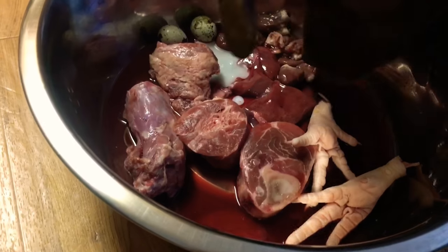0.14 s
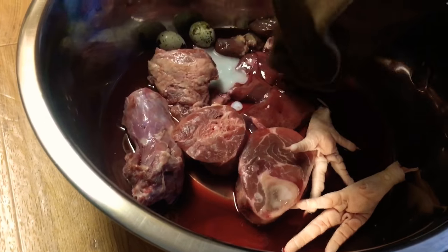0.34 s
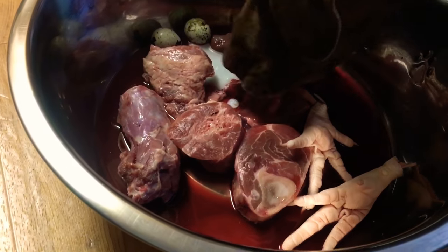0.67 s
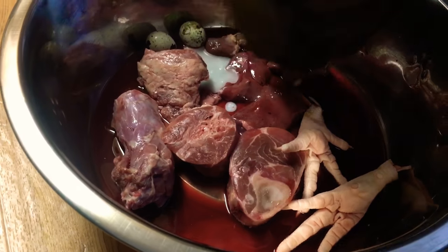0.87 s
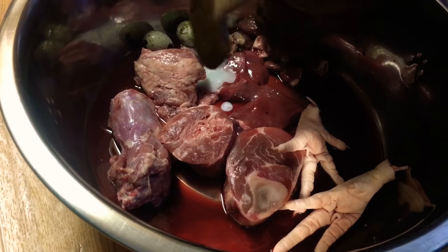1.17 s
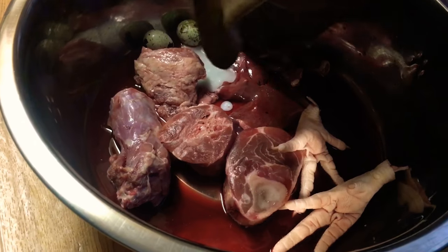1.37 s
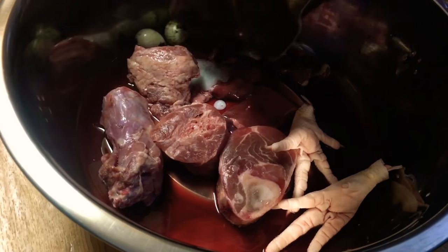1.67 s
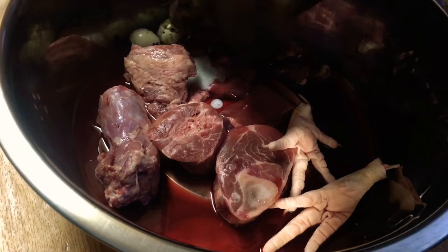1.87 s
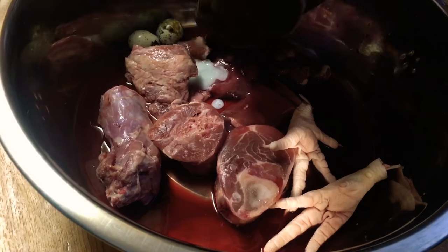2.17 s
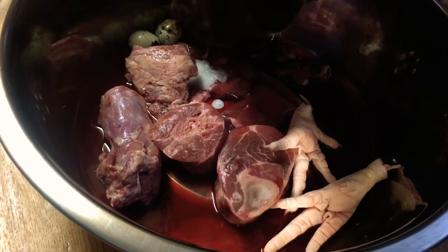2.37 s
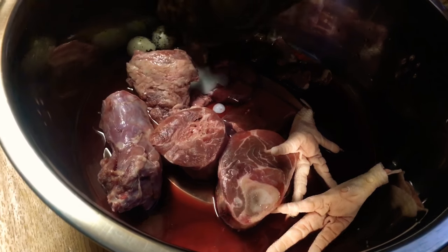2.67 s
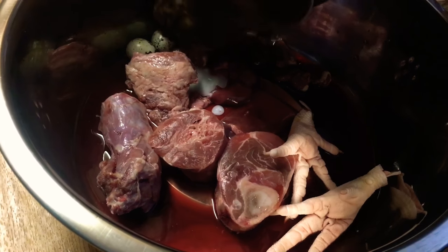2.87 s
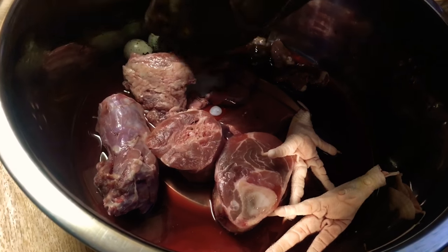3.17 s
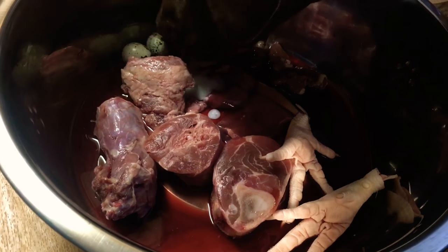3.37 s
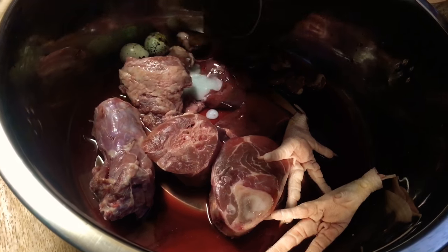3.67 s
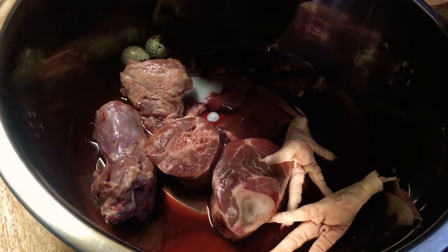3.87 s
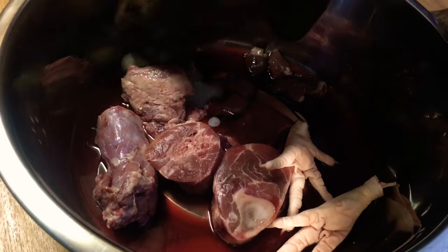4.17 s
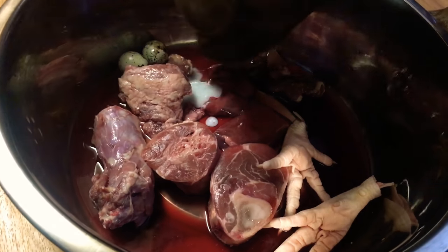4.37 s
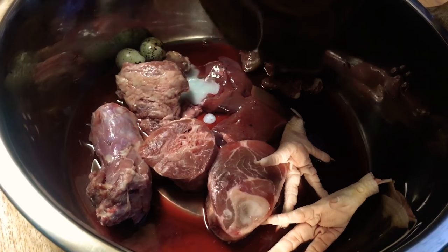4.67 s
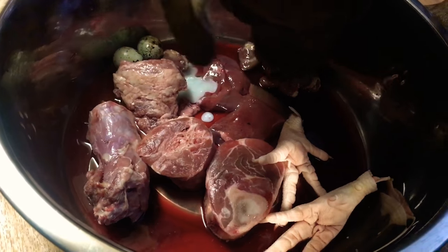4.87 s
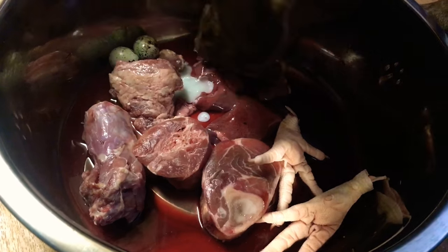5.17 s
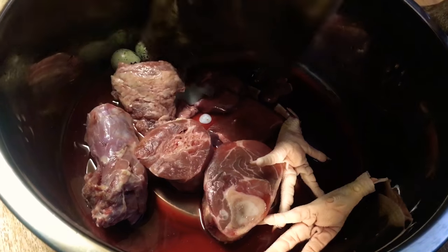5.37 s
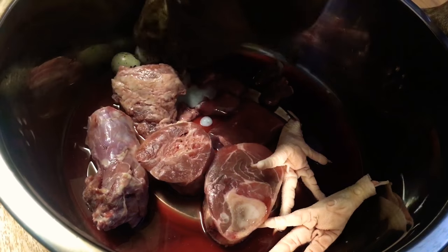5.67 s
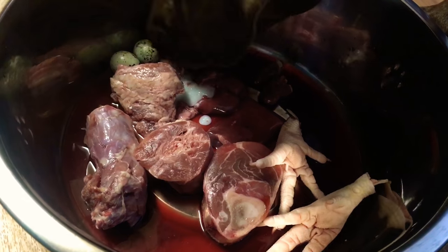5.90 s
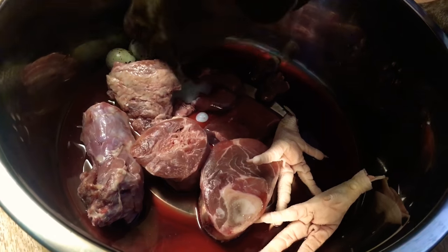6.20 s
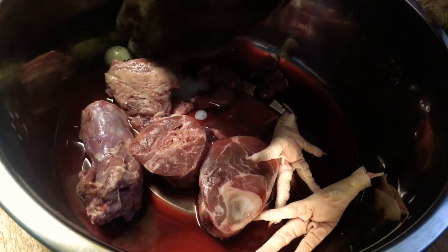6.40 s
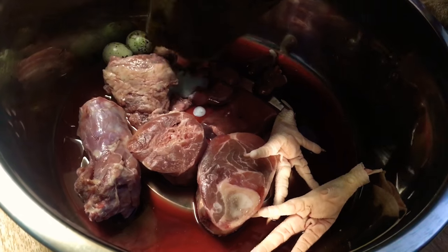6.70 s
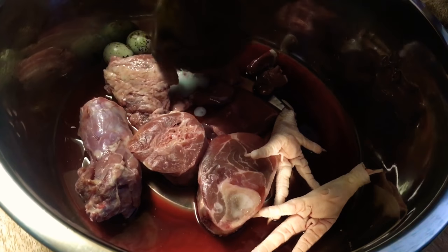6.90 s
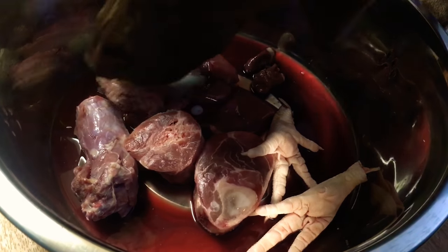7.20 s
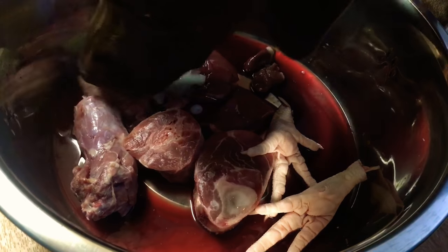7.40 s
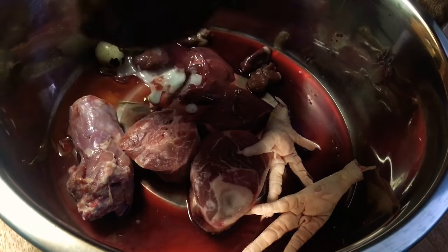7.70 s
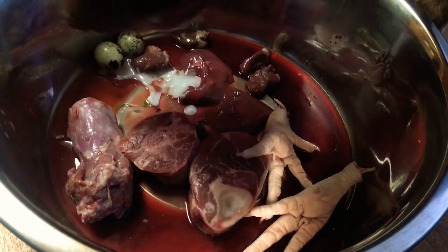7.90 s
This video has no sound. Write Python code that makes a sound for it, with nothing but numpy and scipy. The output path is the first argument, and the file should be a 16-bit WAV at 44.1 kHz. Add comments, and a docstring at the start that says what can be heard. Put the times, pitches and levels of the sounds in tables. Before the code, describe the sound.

Very close to a steel bowl in a quiet room, a dog licks and chews raw meat. After opening thuds and soft licks, wet smacks come several a second, some popping sharply, amid squelching, fine saliva crackle and a low rumble of shifting meat. Heavy dull knocks land near five and six seconds; then the eating eases into softer licks.

```python
"""A dog eats raw meat out of a steel bowl, heard from just above the rim in a quiet room.
Wet smacks are short decaying sines with a noise snap; saliva ticks are noise bursts ringing high up.
Squelch, fizz and the rumble of the shifting load are showers of tiny ringing grains under level curves.
Muzzle thuds are sines that sink in pitch; a faint metal ting, sucks of ringing noise and room noise join.
"""
import sys
import numpy as np
from scipy import signal
from scipy.fft import rfft, irfft, next_fast_len
from scipy.io import wavfile
from scipy.ndimage import uniform_filter1d

SR = 44100
rng = np.random.default_rng(int(sys.argv[2]) if len(sys.argv) > 2 else 0)


def bounce(signal):
    """Save signal as a 16-bit WAV file at the path given by the first command-line argument."""
    frames = np.transpose(np.atleast_2d(signal))
    limited = np.clip(frames, -1, 1)
    pcm = np.round(limited * 32767).astype(np.int16)
    wavfile.write(sys.argv[1], SR, pcm)


N = 355005

# Steady room noise, relative spectrum: f/Hz, density/dB
ROOM_COLOUR = [(25, -37), (45, -38), (72, -5.5), (200, -7.5), (420, -17), (680, -13.5), (850, -20),
               (1300, -18.5), (2550, -17), (3650, -24), (4350, -32.5), (5100, -40), (9500, -37.5),
               (16000, -56.5)]
# Resonances in the room noise: f/Hz, width of each pass/Hz, rms level before the waver/dB
ROOM_RESONANCES = [(1031, 150, -58.5), (2624, 300, -64), (9490, 390, -76.5)]
# Meat shifting under the muzzle, before the trim in jostling(): t/s, rumble level/dB
JOSTLE_CURVE = [(0, -40.5), (1.41, -41), (2.82, -41), (3.2, -43.5), (4, -42.5), (4.9, -45), (5.9, -45.5),
                (6.5, -40.5), (7.4, -44), (7.85, -41), (8.05, -36.5)]
# Colour of that rumble: f/Hz, relative level/dB
LOAD_COLOUR = [(65, -17.5), (85, -3), (115, 4.5), (150, -3.5), (185, -4), (260, -7), (400, -13.5),
               (550, -22.5)]
# Soft chewing between the strokes, before the trim in licking(): t/s, level/dB
CHEWING_CURVE = [(0, -63), (1.2, -50), (2.9, -50.5), (3.25, -45), (4.7, -44), (4.98, -50.5), (5.25, -43.5),
                 (6.6, -45.5), (7.1, -47), (7.62, -44.5), (7.8, -54)]
# Tongue strokes, before the trims in licking(): t at the height/s, squelch level/dB, saliva fizz level/dB
LICKS = [(.07, -49, -59), (.26, -57, -59.5), (.75, -49, -70), (1.04, -47, -57), (1.19, -51, -57.5),
         (1.42, -42.5, -59), (1.58, -49, -56.5), (1.835, -49, -66), (1.98, -43, -61), (2.23, -42, -63),
         (2.47, -42.5, -59), (2.665, -43.5, -62), (2.93, -45, -53), (3.04, -54, -55), (3.16, -43, -68),
         (3.35, -41, -58), (3.56, -41, -63), (3.75, -41, -67), (3.96, -44.5, -63), (4.08, -50, -57),
         (4.31, -41.5, -64), (4.49, -39.5, -64), (4.65, -43, -62), (5.09, -48, -65), (5.21, -52, -56.5),
         (5.469, -44, -56), (5.68, -49, -59.5), (5.88, -40, -56), (6.08, -38, -62), (6.24, -40.5, -55),
         (6.45, -45, -55), (6.56, -44, -64), (6.77, -40.5, -57), (6.922, -45.5, -60), (7.46, -49, -65),
         (7.56, -51, -59), (7.75, -50, -55.5), (7.93, -45, -53)]
# Colour of the squelch in the mouth: f/Hz, relative level/dB
MOUTH_COLOUR = [(800, -11), (1050, -9.5), (1350, -3), (1700, -4.5), (2200, 1), (2800, -5), (3500, -9.5),
                (4500, -50)]
# Colour of the saliva fizz: f/Hz, relative level/dB
FIZZ_COLOUR = [(4500, -41.5), (6200, 5), (7500, 12.5), (8600, 1), (9600, 8.5), (11500, 1), (15000, -0.5)]
# Dull knocks of muzzle and meat, before the bowl colours them: t/s, level/dB, final f/Hz
THUDS = [(0.0041, -7.5, 110), (0.076, -12.5, 112), (0.089, -14.5, 100), (1.497, -19, 99),
         (1.5551, -11, 113), (1.7019, -4.5, 125), (2.1556, -16, 102), (2.199, -19, 119), (3.1628, -21, 101),
         (3.2428, -23.5, 104), (3.6123, -25, 86.5), (3.928, -19.5, 122), (4.0128, -19, 114),
         (4.9443, 1.5, 110.5), (6.2922, 2.5, 108), (6.3273, -6, 119), (6.67, -20, 94)]
# How the loaded bowl colours a knock: f/Hz, width/Hz, gain/dB
BOWL_BODY = [(288, 350, -3.5), (470, 98, 2), (750, 620, -12), (1050, 220, 21)]
# Loudest saliva threads snapping: t/s, peak level/dB, f/Hz
TICKS = [(1.0559, -39, 7900), (1.1848, -39, 8200), (1.5804, -39, 6600), (1.683, -40.5, 6560),
         (1.9789, -37, 7850), (2.2503, -42, 8300), (2.6592, -40, 7300), (2.981, -35.5, 9700),
         (3.0061, -38, 7650), (3.063, -35.5, 7440), (4.314, -32, 6700), (4.517, -41, 6800),
         (5.7075, -44, 6600), (6.7738, -41, 7100), (6.9072, -37, 6470), (7.766, -42, 7500),
         (7.9237, -38, 8050)]
# Loud smacks of tongue and lips: t/s, pop peak level/dB, pocket f/Hz,
# decay/cycles (held to at least 0.5), film snap peak level/dB
SMACKS = [(0.0735, -29.5, 1470, 1.4, -49), (0.45, -36.5, 3360, 1.8, -49), (0.7433, -32, 1400, 1.3, -40.5),
          (1.0358, -23, 3100, .82, -38), (1.2311, -29, 2140, 5.8, -47), (1.4082, -29, 2700, 1.4, -50),
          (1.597, -32, 3520, 7.3, -36), (1.6721, -29.5, 980, 1.8, -53), (1.7401, -24, 1840, 1.2, -62),
          (1.817, -26, 2510, 6.4, -45), (1.9235, -29, 1870, 1.1, -60), (1.9473, -14.5, 1810, 0.43, -57),
          (1.9833, -16.5, 1610, 2.1, -50), (2.0211, -28, 2140, 2.8, -50), (2.2224, -24.5, 2000, 2, -55),
          (2.244, -28, 1500, .9, -54), (2.4332, -7, 2270, 1.8, -34), (2.4404, -21, 2120, 2.6, -33.5),
          (2.4732, -25, 2400, .78, -37.5), (2.5999, -18, 2650, 0.85, -33), (2.6439, -8, 2360, 2.2, -39),
          (2.8772, -17.5, 2500, 3.2, -25.5), (2.954, -24, 1500, 0.55, -49), (2.9623, -26, 2970, 1.6, -44),
          (3.1303, -1.5, 2020, 1.3, -32), (3.137, -16, 2170, 2.5, -35), (3.1517, -21, 2120, 1.1, -43),
          (3.166, -22, 2320, 1, -47), (3.214, -23.5, 1930, .43, -60), (3.3321, -33.5, 4600, 1.5, -48),
          (3.3464, -24.5, 2030, 3.6, -41), (3.3634, -23, 2700, 3.4, -53), (3.382, -27, 2210, 2, -53),
          (3.5698, -26.5, 1980, 0.8, -51), (3.7393, -24, 1630, 3, -41.5), (3.7935, -26, 2020, 1.8, -51),
          (4.0642, -25, 2130, 2, -42), (4.073, -18.5, 2300, 2.8, -30), (4.1292, -33, 3630, 4, -42),
          (4.3136, -18, 1910, 3.5, -44), (4.3156, -21, 2820, 6, -47), (4.401, -32, 2020, 7.6, -42),
          (4.4894, -30, 1500, 1.4, -56), (4.4944, -30.5, 2550, 3, -55), (4.5795, -25, 3360, 9.3, -42),
          (4.5863, -23, 3000, 1.2, -44), (4.6338, -18.5, 2300, 0.54, -52), (4.641, -25.5, 1580, 2.1, -34),
          (5.0354, -30.5, 2740, .85, -40), (5.0851, -29, 1430, 3.2, -48), (5.0923, -24.5, 2740, 1.3, -53),
          (5.2587, -30, 2120, 1, -47), (5.4433, -16.5, 1730, 1.3, -48), (5.4504, -5.5, 1590, 0.81, -28.5),
          (5.484, -24, 2820, 4, -32.5), (5.658, -20, 1710, 1.2, -58), (5.8352, -21.5, 1110, 4.8, -47),
          (5.8733, -25.5, 1900, 3.1, -49), (5.9033, -24, 2660, 4.3, -37), (5.9354, -21, 2260, .46, -48),
          (6.0084, -28.5, 3400, .69, -40), (6.067, -25.5, 2020, 3.6, -36), (6.0714, -27, 1680, 1.6, -56),
          (6.1, -25, 2370, 1, -39), (6.2738, -13, 1910, 2.9, -30.5), (6.283, -19.5, 2000, .58, -47),
          (6.4155, -19, 2600, 9.9, -36), (6.4264, -22, 2240, 1.3, -47), (6.5067, -21.5, 2180, 0.96, -38),
          (6.5559, -24.5, 2100, 2.5, -51), (6.6937, -31, 1950, 4, -39), (6.7654, -25.5, 2040, 5, -40),
          (7.185, -33, 1010, 2.4, -63), (7.462, -30, 1840, 3.6, -58), (7.532, -31, 1144, 5.6, -59),
          (7.7525, -34, 1310, 1.1, -37), (7.916, -33, 2500, 4.7, -39.5)]
# One thin metallic ting: t/s, level before the soft attack/dB, f/Hz, t60/s
TING = [(.105, -55.5, 7806, .3)]
# Drawn-out sucks of a ringing wet cavity: t/s, peak level/dB, f/Hz, length/s
SUCKS = [(3.891, -31, 355, 0.018), (4.002, -27.5, 346, .016), (4.004, -34.5, 532, 0.019),
         (4.076, -47, 6150, .045), (4.082, -42, 2120, .04), (7.911, -29, 2400, .03),
         (7.925, -32, 940, 0.011), (7.946, -38, 2320, 0.035)]

ROOM_DB, CUTOFF_HZ = -49, 15900
CHEW_FIZZ_DB = -65.5  # before the trim in licking()
LICK_RISE_S, LICK_RELEASE_S = 0.017, 0.04
FIZZ_RISE_S, FIZZ_RELEASE_S = 0.014, 0.046

# After a hard knock the load drops back once
REBOUND_ABOVE_DB, REBOUND_LOSS_DB, REBOUND_HZ = -7, 11.5, 104
REBOUND_S, REBOUND_S_PER_DB = 0.0148, 0.00063

# Lesser saliva threads round each stroke; level is above the stroke's tabled fizz
THREAD_OVER_DB, THREAD_SCATTER_DB, THREAD_SPREAD_S = 12.5, 2.5, 0.04
THREAD_HZ, THREAD_OCTAVES = 7900, 0.2

# Lesser pops round each stroke; level is above the stroke's tabled squelch, the snap relative to the pop
POP_OVER_DB, POP_SCATTER_DB, POP_SNAP_DB = 8, 2, -20.5
POP_LAG_S, POP_SPREAD_S = 0.01, 0.021
POP_HZ, POP_OCTAVES, POP_CYCLES = 2164, 0.35, 1.7


def from_db(db):
    """Decibels to gain."""
    return 10 ** (np.asarray(db) / 20)


def rms_one(x):
    """Scale to an rms of one."""
    return x / np.sqrt(np.mean(x ** 2) + 1e-20)


def level_curve(rows):
    """Read a (t/s, level/dB) curve at every sample."""
    s, db = np.transpose(rows)
    return np.interp(np.arange(N) / SR, s, db)


def at_hz(points, hz):
    """Read a spectrum on a log-frequency axis."""
    points = np.array(points)
    return np.interp(np.log(np.maximum(hz, 1)), np.log(points[:, 0]), points[:, 1])


def add(out, s, sound):
    """Mix a sound in at a time."""
    i = int(np.clip(round(s * SR), 0, N))
    out[i:i + len(sound)] += sound[:N - i]


def band(x, low_hz, high_hz, order=2):
    """Butterworth band-pass."""
    sos = signal.butter(order, [low_hz, high_hz], "band", fs=SR, output="sos")
    return signal.sosfilt(sos, x)


def resonate(x, hz, width_hz):
    """One resonance with a gain of about one on top."""
    r = np.exp(-np.pi * width_hz / SR)
    feed = np.array([1, 0, -1]) * (1 - r * r) / 2
    feedback = [1, -2 * r * np.cos(2 * np.pi * hz / SR), r * r]
    return signal.lfilter(feed, feedback, x + 1e-18)


def resonate_twice(x, hz, width_hz):
    """Two equal resonances in a row, for steeper skirts."""
    return resonate(resonate(x, hz, width_hz), hz, width_hz)


def drift(rate):
    """Slow random wander with an rms of one, through `rate` fresh values a second."""
    knots = rng.standard_normal(N // 50)
    return rms_one(np.interp(np.arange(N) / SR * rate, np.arange(len(knots)), knots))


def swell(t, rise, decay):
    """A rounded attack and an exponential tail, peak one."""
    shape = (1 - np.exp(-(t / rise) ** 2)) * np.exp(-t / decay)
    return shape / shape.max()


def grains(colour, per_s, spread_db, sharpness, evenness, count=22):
    """Small random impulses, each ringing briefly at one of `count` pitches; rms one."""
    sizes = from_db(spread_db * np.minimum(rng.exponential(1, N), 4)) * rng.choice([-1, 1], N)
    clicks = sizes * (rng.random(N) < per_s / SR)
    pitch_index = rng.integers(0, count, N)
    out = np.zeros(N)
    for k, hz in enumerate(np.geomspace(colour[0][0], colour[-1][0], count)):
        ring = resonate_twice(clicks * (pitch_index == k), hz, hz / sharpness)
        out += from_db(at_hz(colour, hz)) * rms_one(ring)
    # evenness 1 nearly flattens the lumps in level, 0 leaves them alone
    local_power = uniform_filter1d(rms_one(out) ** 2, size=1500)
    return rms_one(out / (np.abs(local_power) + 1e-3) ** (evenness / 2))


def room(waver_db=3.0):
    """A low rumble and a soft hiss, with a few broad resonances that waver together."""
    size = next_fast_len(N)
    hz = np.arange(size // 2 + 1) * SR / size
    spectrum = rfft(rng.standard_normal(size)) * from_db(at_hz(ROOM_COLOUR, hz))
    air = rms_one(irfft(spectrum, size)[:N])
    drone = np.zeros(N)
    for f, width_hz, db in ROOM_RESONANCES:
        drone += from_db(db) * rms_one(resonate_twice(rng.standard_normal(N), f, width_hz))
    return from_db(ROOM_DB) * air + drone * from_db(waver_db * drift(9.8))


def jostling(trim_db=1.5):
    """Countless small nudges of the load make a lumpy rumble in the bowl."""
    nudges = grains(LOAD_COLOUR, per_s=330, spread_db=3.0, sharpness=2.67, evenness=0.3, count=12)
    return from_db(level_curve(JOSTLE_CURVE) + trim_db) * nudges


def strokes(rows, rise, release):
    """Power of the tongue's strokes: each builds as it presses in and dies away as it draws back."""
    t = np.arange(0, N, 40) / SR  # coarse steps are enough for a slow envelope
    power = np.zeros(len(t))
    for s, db in rows:
        envelope = np.exp(-np.maximum((s - t) / rise, (t - s) / release))
        power += (from_db(db) * envelope) ** 2
    return np.interp(np.arange(N) / SR, t, power)


def licking(squelch_trim_db=-5.0, fizz_trim_db=-5.0):
    """The tongue works the wet meat: a squelch of bubbles and a fine fizz of saliva."""
    squelch_rows = [(s, db) for s, db, _ in LICKS]
    fizz_rows = [(s, db) for s, _, db in LICKS]
    chew_power = from_db(level_curve(CHEWING_CURVE)) ** 2
    squelch_power = chew_power + strokes(squelch_rows, LICK_RISE_S, LICK_RELEASE_S)
    fizz_power = from_db(CHEW_FIZZ_DB) ** 2 + strokes(fizz_rows, FIZZ_RISE_S, FIZZ_RELEASE_S)
    bubbles = grains(MOUTH_COLOUR, per_s=1200, spread_db=2.0, sharpness=4.5, evenness=0.18)
    spray = grains(FIZZ_COLOUR, per_s=1400, spread_db=5.0, sharpness=5.0, evenness=1.0)
    squelch = from_db(squelch_trim_db) * np.sqrt(squelch_power) * bubbles
    fizz = from_db(fizz_trim_db) * np.sqrt(fizz_power) * spray
    return squelch + fizz


def knocks():
    """Every knock, and the weaker rebound of a hard one, which comes later the harder it was."""
    rebounds = [(s + REBOUND_S + REBOUND_S_PER_DB * db, db - REBOUND_LOSS_DB, REBOUND_HZ)
                for s, db, _ in THUDS if db > REBOUND_ABOVE_DB]
    return THUDS + rebounds


def thuds(start_hz=670, settle=0.0027, rise=0.0023, length=0.013, body_hz=112,
          hardening=0.011, softening=0.03):
    """A soft blow on the damped bowl: the pitch starts high and sinks within two or three swings."""
    out, t = np.zeros(N), np.arange(SR // 15) / SR
    for s, db, hz in knocks():
        first_hz = start_hz * np.exp(hardening * db)   # flesh is stiffer under a stronger blow
        contact = rise * np.exp(-softening * db)       # and a gentle push builds more slowly
        turns = hz * t + (first_hz - hz) * settle * (1 - np.exp(-t / settle))
        attack = 1 - np.exp(-(t / contact) ** 2)
        fade = np.exp(-(t * hz / body_hz / length) ** 2)  # a lower knock lasts longer
        add(out, s, -from_db(db) * attack * fade * np.sin(2 * np.pi * turns))
    for hz, width_hz, db in BOWL_BODY:
        out = out + (from_db(db) - 1) * resonate(out, hz, width_hz)
    return out


def lesser_threads(count=2):
    """Each stroke pulls a few thin threads of saliva; rows like those of TICKS."""
    rows = []
    for (s, _, fizz_db), draws in zip(LICKS, rng.standard_normal((len(LICKS), count, 3))):
        for when, strength, pitch in np.clip(draws, -2, 2):
            db = fizz_db + THREAD_OVER_DB + THREAD_SCATTER_DB * strength
            hz = THREAD_HZ * 2 ** (THREAD_OCTAVES * pitch)
            rows.append((s + THREAD_SPREAD_S * when, db, hz))
    return rows


def ticks(threads, rise=0.00017, decay=0.0019, width_hz=1300):
    """Saliva threads part with a short bright ring."""
    out, t = np.zeros(N), np.arange(SR // 100) / SR
    for s, db, hz in threads:
        burst = rng.standard_normal(len(t)) * swell(t, rise, decay)
        snap = band(resonate(burst, hz, width_hz), 3900, 9200)
        add(out, s, from_db(db) * snap / np.abs(snap).max())
    return out


def lesser_pops(count=3):
    """As the tongue draws back, a few small air pockets of chance size burst; rows like those of SMACKS."""
    rows = []
    for (s, squelch_db, _), draws in zip(LICKS, rng.standard_normal((len(LICKS), count, 4))):
        for when, strength, pitch, damping in np.clip(draws, -2, 2):
            start = s + POP_LAG_S + POP_SPREAD_S * when
            db = squelch_db + POP_OVER_DB + POP_SCATTER_DB * strength
            hz = POP_HZ * 2 ** (POP_OCTAVES * pitch)
            cycles = POP_CYCLES * 2 ** (damping / 2)
            rows.append((start, db, hz, cycles, db + POP_SNAP_DB))
    return rows


def smacks(pops, rise=0.00081, glide=0.0039, snap_rise=0.00055, snap_decay=0.0018):
    """A wet film tears and the opened air pocket rings for a few cycles, rising slightly."""
    out, t = np.zeros(N), np.arange(SR // 50) / SR
    for s, db, hz, cycles, film_db in pops:
        decay = max(cycles, 0.5) / hz
        turns = np.cumsum(hz * (1 + glide * np.tanh(t / decay - 1))) / SR
        pop = swell(t, rise, decay) * np.sin(2 * np.pi * turns)
        burst = rng.standard_normal(len(t)) * swell(t, snap_rise, snap_decay)
        snap = band(burst, 2260, 9300, order=3)
        add(out, s, from_db(db) * pop + from_db(film_db) * snap / np.abs(snap).max())
    return out


def froth(pops, reach=0.0033, lag=0.0021, share=0.56, bubbles_db=-24.0, spray_db=-49.0):
    """Small bubbles and a fine spray break just before and after each smack, more round a strong one."""
    t = np.arange(SR // 15) / SR
    middle = t.mean()
    hump = np.exp(-np.abs(t - middle) / reach)
    power = np.zeros(N)
    for s, db, *_ in pops:
        add(power, s + lag - middle, (from_db(share * db) * hump) ** 2)
    bubbles = grains(MOUTH_COLOUR, per_s=1700, spread_db=3.5, sharpness=4.9, evenness=1.0)
    spray = grains(FIZZ_COLOUR, per_s=1000, spread_db=4.0, sharpness=9.7, evenness=0.5)
    return np.sqrt(power) * (from_db(bubbles_db) * bubbles + from_db(spray_db) * spray)


def ting():
    """A faint high ring of metal: one sine with a soft attack and an even decay."""
    out, t = np.zeros(N), np.arange(SR // 2) / SR
    for s, db, hz, t60 in TING:
        envelope = from_db(db - 60 * t / t60) * (1 - np.exp(-t / 0.0063))
        add(out, s, envelope * np.sin(2 * np.pi * hz * t))
    return out


def sucks(sharpness=10.4):
    """Liquid pulled through a narrow gap keeps one cavity ringing."""
    out = np.zeros(N)
    for s, db, hz, length in SUCKS:
        size = int(length * SR)
        ring = resonate_twice(rng.standard_normal(SR // 5), hz, hz / sharpness)
        ring = ring[-size:] * np.hanning(size) ** 0.5  # the settled end of the ringing
        add(out, s, from_db(db) * ring / np.abs(ring).max())
    return out


def bowl(x, tail_db=-15.0, tail_t60=0.049, build=0.0042):
    """Sound scatters between the steel wall and the dog and dies away quickly."""
    t = np.arange(SR // 4) / SR
    scatter = band(rng.standard_normal(len(t)), 610, 12700, order=1)
    tail = scatter * from_db(-60 * t / tail_t60) * (1 - np.exp(-t / build))
    response = from_db(tail_db) * tail / np.sqrt(np.sum(tail ** 2))
    response[0] = 1   # the direct sound
    return signal.fftconvolve(x, response)[:N]


def scene():
    """The mouth sounds inside the bowl, the knocks and nudges, the ting and the room."""
    pops = SMACKS + lesser_pops()
    threads = TICKS + lesser_threads()
    mouth = licking() + ticks(threads) + smacks(pops) + froth(pops) + sucks()
    mix = room() + jostling() + thuds() + ting() + bowl(mouth)
    return mix[None]


def record(dry):
    """The microphone drops the deepest bass, the hardest peaks are rounded and the top is cut."""
    thin = signal.sosfilt(signal.butter(1, 18, "high", fs=SR, output="sos"), dry)
    rounded = thin / (1 + (thin / 1.05) ** 8) ** (1 / 8)
    top_cut = signal.ellip(10, 0.1, 80, CUTOFF_HZ, fs=SR, output="sos")
    return signal.sosfilt(top_cut, rounded)


dry = scene()
out = record(dry)
bounce(out)
```